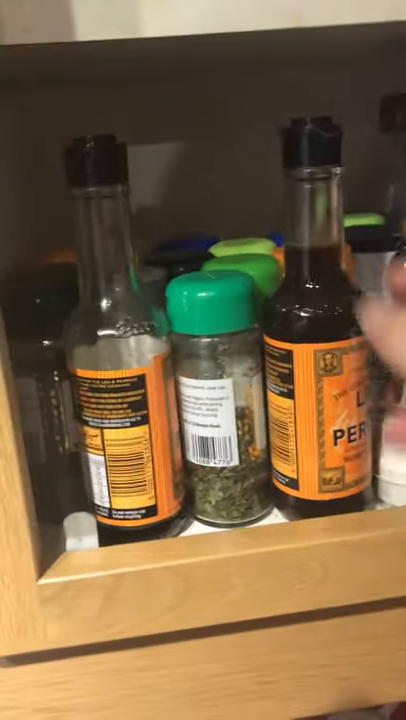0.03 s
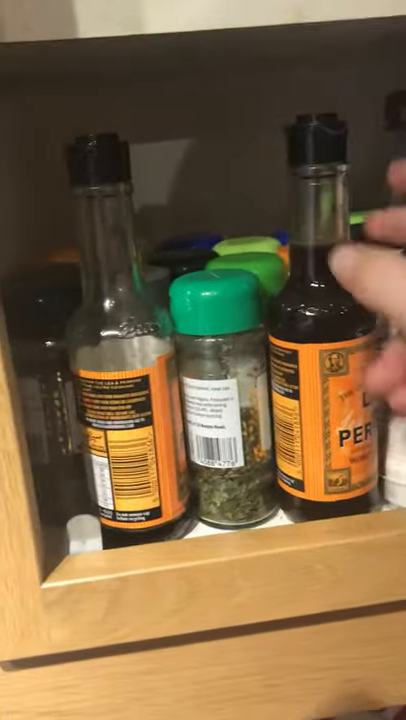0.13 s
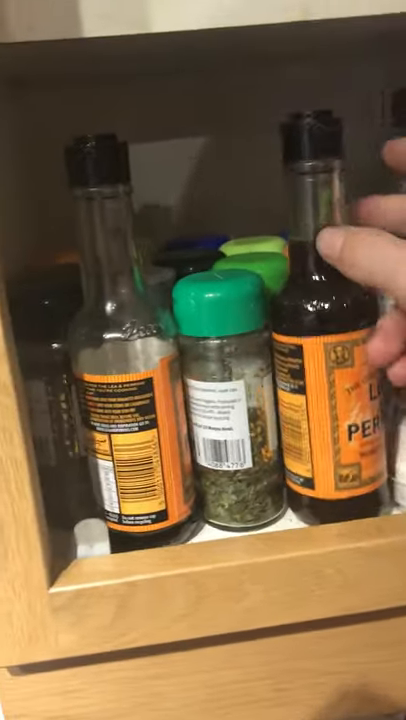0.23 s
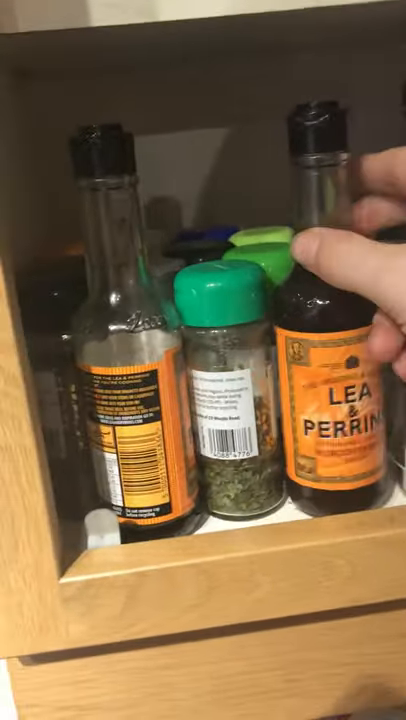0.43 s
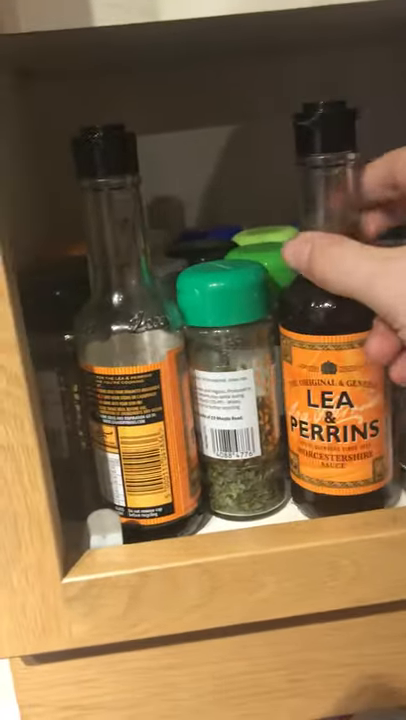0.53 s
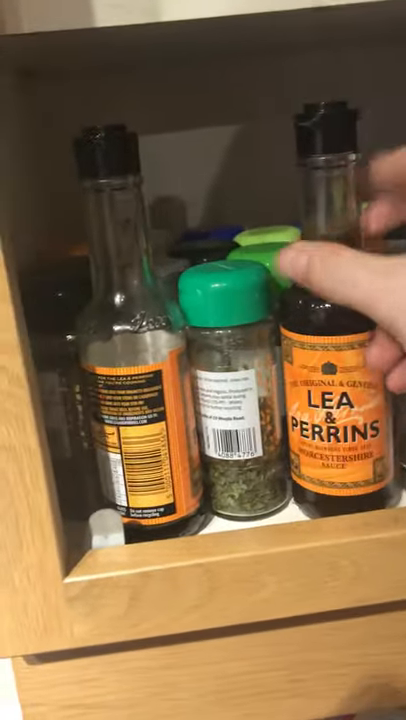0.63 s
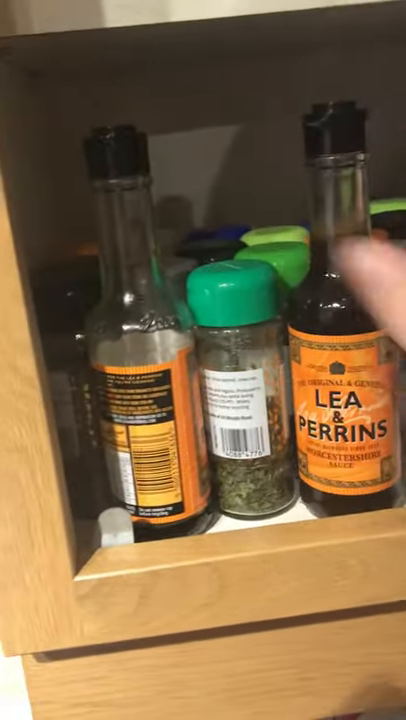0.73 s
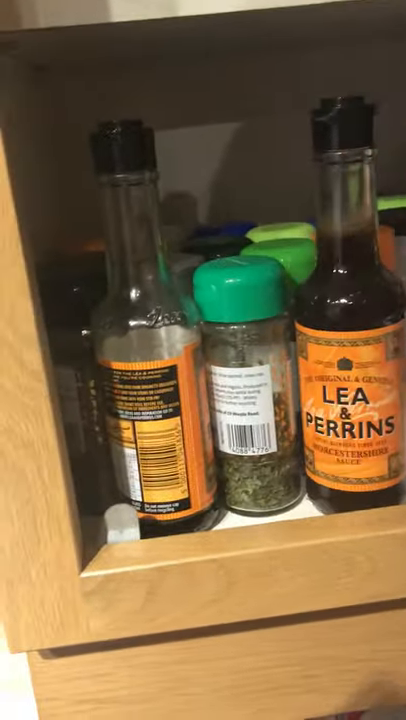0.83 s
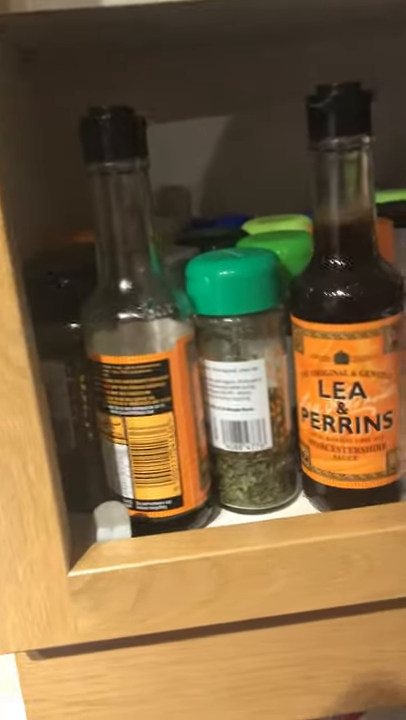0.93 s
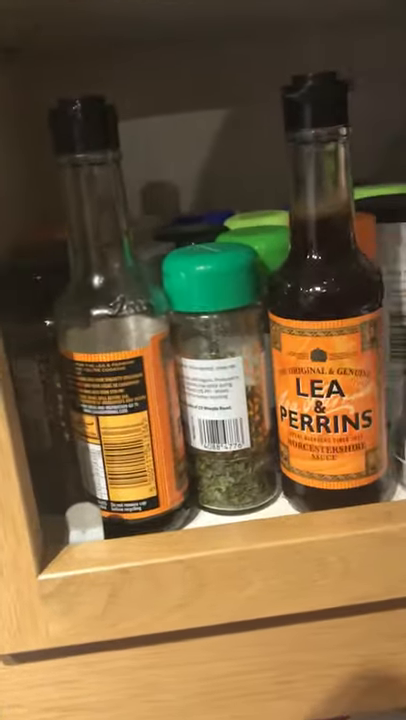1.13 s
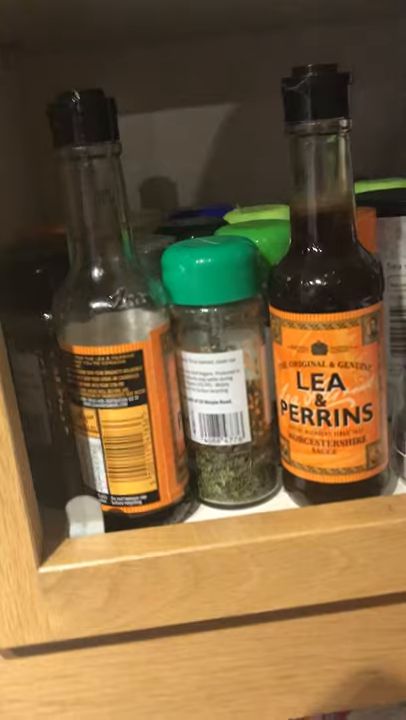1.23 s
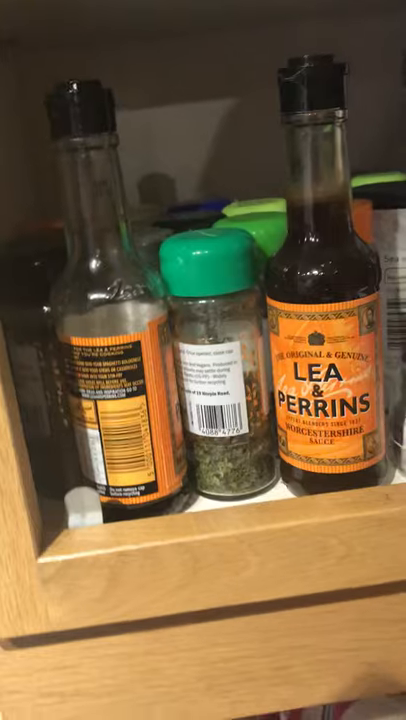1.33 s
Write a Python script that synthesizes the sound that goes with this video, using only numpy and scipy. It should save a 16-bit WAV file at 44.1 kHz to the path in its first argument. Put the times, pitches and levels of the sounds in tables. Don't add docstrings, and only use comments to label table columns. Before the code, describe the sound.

Glass bottle clinks close up in a wooden kitchen cupboard. Faint appliance hum, airy noise and high whine run throughout. At 0.2 s the bottle hits a spice jar with a hard, dry clack; light rocking taps follow until 0.3. Ringing glass clinks come at 0.38 and 0.43, a small touch between, with the ring soon damped. Wooden knocks and scraping fade by about 0.65, leaving only hum.

```python
import sys
import numpy as np
from scipy import signal
from scipy.fft import rfft, irfft
from scipy.io import wavfile
from scipy.ndimage import uniform_filter1d

SR = 44100
rng = np.random.default_rng(int(sys.argv[2]) if len(sys.argv) > 2 else 0)


def gain_from_decibels(decibels):
    exponent = np.asarray(decibels, float) / 20
    return 10 ** exponent


def master_out(mix):
    frames = np.transpose(np.atleast_2d(mix))
    ceiling = np.clip(frames, -1, 1)
    pcm = np.round(ceiling * 32767).astype(np.int16)
    wavfile.write(sys.argv[1], SR, pcm)


N = 61739

# pitch_hz, density_db_per_hz
AIR_SPECTRUM = [(18, -40), (34, -3.5), (102, -5.5), (1650, -21), (3160, -22.5), (4250, -24), (4610, -23.5),
                (7110, -29.5), (16000, -24.5)]
# pitch_hz, width_hz, level_db
WHINE = [(1010, 180, -70), (1294, 173, -68.5), (2340, 59, -71), (3200, 340, -63), (3825, 620, -71),
         (4779, 63, -62), (4595, 150, -65), (6080, 260, -65.5), (6580, 170, -68.5), (7650, 46, -75.5),
         (8566, 120, -74)]
HIGH_WHINE_HZ = [9080, 9670, 10050, 10740, 11100, 11600, 12300, 12900, 13450, 13880, 14560, 14750, 15570]
# width_hz, level_db
HIGH_WHINE = [(120, -76.5), (40, -78), (200, -79.5), (50, -72), (247, -66.5), (350, -67.5), (40, -79),
              (600, -70.5), (300, -62.5), (252, -61.5), (300, -66), (150, -66), (352, -59.5)]
# pitch_hz, width_hz, level_db
HUM = [(44, 56, -68.5), (100.4, 34, -58.5), (126.6, 28, -69.5), (196.6, 19, -64.5), (305, 7, -72),
       (399, 7, -74.5)]
# pitch_hz, level_db
MAINS = [(100, -61), (200.5, -61), (401, -74)]
AIR_DB, FLICKER_DB, FLICKER_RATE_HZ, MAINS_RATE_HZ = -57.5, 0.8, 12, 4.4

# pitch_hz, level_db, t60_s
JAR = [(520, -21.5, 0.016), (1041, -13, 0.02), (2138, -11, 0.014), (1600, -4, 0.006), (2350, -25, 0.028),
       (2915, -2, 0.0178), (3760, -7.5, 0.012), (4500, -33, 0.0125)]
JAR_S = [
    .2014,
    .2026,
    .2038,
]
# level_db, contact_ms
JAR_HITS = [(-16, 0.56), (-15.5, 0.07), (-8, 0.08)]
# pitch_hz, level_db, t60_s
RIM = [(5880, -6, 0.0073), (7950, -7.5, 0.0088), (8730, 1.5, 0.0075), (9830, -5.5, 0.008),
       (11650, -22, 0.0069), (13150, -28, .006)]
RIM_S = [
    .2026,
    .2043,
]
# level_db, contact_ms
RIM_HITS = [(-6, 0.059), (-24, 0.043)]
JAR_WALL_HZ = [6050, 6245, 8630, 6335, 9750, 8370, 8860, 6610, 14400]
# level_db, t60_s
JAR_WALL = [(-22.5, 0.39), (3, 0.057), (-32, 0.42), (-22, 0.048), (-25, 0.19), (-24, 0.113), (-24.5, 0.28),
            (-33, 0.108), (-26, .06)]
# start_s, level_db, contact_ms
JAR_WALL_HITS = [
    (.2044, -16, 0.068),
]
FILLING_HZ = [1320]
# level_db, t60_s
FILLING = [(0, 0.0074)]
# start_s, level_db, contact_ms
FILLING_HITS = [
    (.2033, -12.5, .3),
    (.2048, -14.5, 0.25),
]
JAR_BASE_HZ = [190, 318, 700, 872]
# level_db, t60_s
JAR_BASE = [(-12.5, 0.056), (-7, 0.12), (-3.5, 0.012), (-7, 0.034)]
# start_s, level_db, contact_ms
JAR_BASE_HITS = [
    (.2025, -27.5, 0.24),
    (.2072, -28.5, .3),
    (.2118, -26, 0.33),
    (.2720, -38, .4),
    (.2830, -34, .4),
]
ROCK_HZ = [900, 1325, 1645, 2360, 2840, 3250]
# level_db, t60_s
ROCK = [(-4, 0.019), (-3.5, 0.0198), (1, 0.019), (-8, .03), (-6, 0.034), (-7, 0.031)]
# start_s, level_db, contact_ms
ROCK_HITS = [
    (.2330, -33.5, .1),
    (.2715, -35.5, 0.103),
    (.2745, -39, .15),
    (.2830, -48.5, 0.24),
    (.2950, -44, .15),
]

BOTTLE_HZ = [6735, 7294, 7354, 9440, 9100, 11935, 13060]
# level_db, t60_s
BOTTLE = [(-21.5, 0.19), (-24, 0.31), (-38, 0.097), (-13, 0.081), (4.5, 0.004), (-22, 0.11), (-21, 0.086)]
# start_s, level_db, contact_ms
BOTTLE_HITS = [
    (.3763, -22, 0.0336),
    (.4340, -18.5, 0.099),
]
# pitch_hz, level_db, t60_s
NECK = [(6200, 0.5, 0.025)]
# start_s, level_db, contact_ms
NECK_HITS = [
    (.3764, -29.5, 0.042),
    (.3782, -20, 0.1),
]
# pitch_hz, level_db, t60_s
CAP = [(12900, 1.5, .014), (14800, -21, 0.028)]
# start_s, level_db, contact_ms
CAP_HITS = [
    (.3764, -25.5, 0.0384),
    (.4342, -29.5, .04),
]
FAINT_SHOULDER_HZ = [4700]
# level_db, t60_s
FAINT_SHOULDER = [(0, 0.055)]
# start_s, level_db, contact_ms
FAINT_SHOULDER_HITS = [
    (.3770, -29, .05),
]
# pitch_hz, level_db, t60_s
CONTENTS = [(1263, -7.5, 0.013), (1843, -2, 0.014), (2200, -17.5, 0.03), (2720, -3.5, 0.014),
            (4200, -8, 0.013)]
# start_s, level_db, contact_ms
CONTENTS_HITS = [
    (.3763, -16, 0.078),
    (.4050, -17.5, 0.21),
    (.4345, -16.5, 0.03),
]
BELLY_HZ = [3364]
# level_db, t60_s
BELLY = [(0.014, 0.34)]
BELLY_S = [
    .37643,
    .4341,
]
# level_db, contact_ms
BELLY_HITS = [(-17, 0.0324), (-22, .05)]
SHOULDER_HZ = [4655, 4495]
# level_db, t60_s
SHOULDER = [(3.5, 0.036), (4.5, 0.016)]
# start_s, level_db, contact_ms
SHOULDER_HITS = [
    (.4352, -26.5, .05),
]
NEIGHBOUR_HZ = [3284, 2860, 6050]
# level_db, t60_s
NEIGHBOUR = [(-1.5, 0.47), (-18, 0.046), (-13, 0.12)]
NEIGHBOUR_S = [
    .3765,
    .4341,
]
# level_db, contact_ms
NEIGHBOUR_HITS = [(-61, 0.054), (-24, 0.066)]
# pitch_hz, level_db, t60_s
SMALL_JAR = [(5250, 1, 0.029), (5000, -3, 0.03), (2940, -2, 0.012), (6760, -22.5, 0.059),
             (6260, -9.5, 0.054)]
# start_s, level_db, contact_ms
SMALL_JAR_HITS = [
    (.4052, -24, 0.078),
]

BASE_HZ = [721, 970, 1245, 1810]
# level_db, t60_s
BASE = [(-5.5, 0.022), (-0.5, 0.04), (-10, 0.057), (-4.5, 0.039)]
BASE_S = [
    .4240,
    .4462,
    .4727,
    .4768,
    .4910,
]
# level_db, contact_ms
BASE_HITS = [(-18, 0.6), (-36.5, 0.48), (-25, 0.17), (-26.5, .3), (-30.5, 0.34)]
# pitch_hz, level_db, t60_s
SHELF = [(686, -9, 0.028), (779, -3, 0.038), (889, 3.5, 0.014), (961, 0, 0.058), (1040, -2.5, 0.021),
         (1284, -5, 0.069), (1495, -1.5, 0.033), (1590, -13, 0.03), (1654, -5.5, 0.05), (1866, -16, 0.081),
         (2230, -10, 0.025), (3000, -46, .04)]
# start_s, level_db, contact_ms
SHELF_HITS = [(.3590, -38.5, 0.57), (.3790, -22.5, 0.67), (.4290, -32, 0.33), (.4830, -38, 0.24),
              (.4990, -34.5, .3), (.5060, -34, 0.24), (.5140, -39, .3), (.5220, -39, 0.34),
              (.5460, -44, 0.44)]
# pitch_hz, level_db, t60_s
CARCASS = [(156.6, -6, 0.096), (204, -8, 0.06), (238, -3, 0.11), (333, -6, 0.078), (417, -4, 0.048)]
# start_s, level_db, contact_ms
CARCASS_HITS = [(.208, -48, 3.5), (.245, -42, 1.1), (.272, -44, 0.89), (.3, -43.5, 1.17),
                (.386, -28.5, 0.59), (.399, -35.5, 1.1), (.42, -49, 2.5), (.485, -32, 2.03),
                (.505, -25.5, 2.65), (.525, -36.5, 1.3), (.57, -37.5, 2.09)]
# pitch_hz, level_db, t60_s
WORKTOP = [(96, 2.5, 0.11), (120, -20, 0.17), (160, -1, 0.13)]
# start_s, level_db, contact_ms
WORKTOP_HITS = [
    (.395, -34, 1.2),
    (.438, -29, 1.8),
    (.498, -35.5, 2.5),
    (.61, -68, 4.9),
]
BOARD_HZ = [1005, 1260]
# level_db, t60_s
BOARD = [(-4, 0.12), (-8, 0.061)]
# start_s, level_db, contact_ms
BOARD_HITS = [
    (.4770, -44.5, 0.23),
    (.5050, -44.5, .3),
    (.5460, -36.5, 0.37),
    (.5930, -36, 0.67),
]

CRACK_S = [
    .2000,
    .2026,
    .3761,
    .4048,
    .4230,
    .4338,
]
# level_db, t60_s, centre_hz
CRACKS = [(-43, 0.027, 8000), (-3.5, 0.0047, 1460), (-19, 0.026, 1240), (-38, 0.0066, 11000),
          (-29.5, 0.066, 7400), (-26, 0.047, 1580)]
# time_s, effort_db
DRAG = [(.205, -38.5), (.25, -49), (0.287, -51), (.312, -57), (.37, -53), (.44, -44), (0.499, -39),
        (.55, -52.5), (0.662, -63.5)]
# level_db, t60_s, top_hz
TAILS = [
    (-13, .05, 9000),
    (-28, .3, 4000),
]

DRAG_GRAINS_PER_S, DRAG_SCATTER_DB = 500, 1
DRAG_SHELF_DB, DRAG_CARCASS_DB, DRAG_HISS_DB, DRAG_HISS_HZ = -22, -28.5, 9, 1910
RISE_HZ, RISE_SHARE = 119, 0.36
GRIP_S, GRIP_DB, GRIP_SETTLES_S = 0.4515, -11.5, 0.021
MIC_LOW_HZ, DIP_HZ, DIP_WIDTH_HZ, DIP_SHARE = 70, 568, 87, 0.034
TOP_HZ = 15750


def tuned(first, rest):
    return [(f, *row) for f, row in zip(first, rest)]


def unit(x):
    return x / np.sqrt(np.mean(x ** 2))


def band(x, hz, width_hz):
    return signal.lfilter(*signal.iirpeak(hz, hz / width_hz, fs=SR), x)


def walk(rate_hz):
    k = int(SR / rate_hz)
    smooth = uniform_filter1d(rng.standard_normal(N), k)
    return unit(uniform_filter1d(smooth, k))


def appliance():
    f = np.maximum(np.fft.rfftfreq(N, 1 / SR), 1)
    hz, db = np.array(AIR_SPECTRUM).T
    shape = gain_from_decibels(np.interp(np.log(f), np.log(hz), db))
    air = irfft(rfft(rng.standard_normal(N)) * shape, N)
    out = gain_from_decibels(AIR_DB) * unit(air)
    for hz, width_hz, db in WHINE + tuned(HIGH_WHINE_HZ, HIGH_WHINE) + HUM:
        tone = rng.standard_normal(N)
        for _ in range(2):
            tone = band(tone, hz, 1.4 * width_hz)
        out = out + gain_from_decibels(db + FLICKER_DB * walk(FLICKER_RATE_HZ)) * unit(tone)
    t = np.arange(N) / SR
    for hz, db in MAINS:
        out = out + gain_from_decibels(db + walk(MAINS_RATE_HZ)) * np.sqrt(2) * np.sin(2 * np.pi * hz * t)
    return out


def resonate(x, hz, t60_s):
    r = np.exp(-np.log(1000) / (t60_s * SR))
    w = 2 * np.pi * hz / SR
    return signal.lfilter([0, np.sin(w)], [1, -2 * r * np.cos(w), r * r], x)


def ring(x, modes):
    out = 0
    for k, (hz, db, t60_s) in enumerate(modes):
        mode = band(resonate(x, hz, t60_s), hz, RISE_HZ + RISE_SHARE * hz)
        out = out + (-1) ** k * gain_from_decibels(db) * mode
    return out


def blows(hits):
    t, out = np.arange(N) / SR, np.zeros(N)
    for start_s, db, contact_ms in hits:
        spread_s = contact_ms / 4000
        push = np.exp(-.5 * ((t - start_s) / spread_s) ** 2)
        out += gain_from_decibels(db) * push / push.sum()
    return out


def strike(pairs):
    return sum(ring(blows(hits), modes) for hits, modes in pairs)


def cracks():
    t, noise, out = np.arange(N) / SR, rng.standard_normal(N), 0
    for start_s, db, t60_s, hz in tuned(CRACK_S, CRACKS):
        fade = (t >= start_s) * gain_from_decibels(db - 60 * np.maximum(t - start_s, 0) / t60_s)
        out = out + band(noise * fade, hz, 1.935 * hz)
    return out


def spice_jar():
    return strike([
        (tuned(JAR_S, JAR_HITS), JAR),
        (tuned(RIM_S, RIM_HITS), RIM),
        (JAR_BASE_HITS, tuned(JAR_BASE_HZ, JAR_BASE)),
        (FILLING_HITS, tuned(FILLING_HZ, FILLING)),
        (JAR_WALL_HITS, tuned(JAR_WALL_HZ, JAR_WALL)),
        (ROCK_HITS, tuned(ROCK_HZ, ROCK))])


def drag():
    t, (s, db) = np.arange(N) / SR, np.array(DRAG).T
    effort = gain_from_decibels(np.interp(t, s, db, left=-120, right=-120))
    grains = rng.random(N) < DRAG_GRAINS_PER_S / SR
    slips = grains * gain_from_decibels(DRAG_SCATTER_DB * rng.exponential(size=N))
    slips = unit(slips * rng.standard_normal(N)) * effort
    wood = gain_from_decibels(DRAG_SHELF_DB) * ring(slips, SHELF) + gain_from_decibels(DRAG_CARCASS_DB) * ring(slips, CARCASS)
    hiss = band(effort * rng.standard_normal(N), DRAG_HISS_HZ, 0.86 * DRAG_HISS_HZ)
    return wood + gain_from_decibels(DRAG_HISS_DB) * hiss


def cupboard():
    return strike([
        (CARCASS_HITS, CARCASS),
        (SHELF_HITS, SHELF),
        (WORKTOP_HITS, WORKTOP),
        (tuned(BASE_S, BASE_HITS), tuned(BASE_HZ, BASE)),
        (BOARD_HITS, tuned(BOARD_HZ, BOARD))])


def bottles():
    return strike([
        (BOTTLE_HITS, tuned(BOTTLE_HZ, BOTTLE)),
        (CONTENTS_HITS, CONTENTS),
        (NECK_HITS, NECK),
        (CAP_HITS, CAP),
        (tuned(NEIGHBOUR_S, NEIGHBOUR_HITS), tuned(NEIGHBOUR_HZ, NEIGHBOUR)),
        (FAINT_SHOULDER_HITS, tuned(FAINT_SHOULDER_HZ, FAINT_SHOULDER)),
        (SMALL_JAR_HITS, SMALL_JAR),
        (SHOULDER_HITS, tuned(SHOULDER_HZ, SHOULDER))])


def belly():
    since_grip_s = np.maximum(np.arange(N) / SR - GRIP_S, 0)
    grip = gain_from_decibels(GRIP_DB * (1 - np.exp(-since_grip_s / GRIP_SETTLES_S)))
    return grip * ring(blows(tuned(BELLY_S, BELLY_HITS)), tuned(BELLY_HZ, BELLY))


def space(x):
    t, out = np.arange(SR // 2) / SR, x
    for db, t60_s, top_hz in TAILS:
        tail = signal.lfilter(*signal.butter(1, top_hz, fs=SR), rng.standard_normal(len(t)))
        tail = tail * gain_from_decibels(-60 * t / t60_s) * (t > .002)
        tail = tail / np.sqrt(np.sum(tail ** 2))
        out = out + gain_from_decibels(db) * signal.fftconvolve(x, tail)[:N]
    return out


def scene():
    background = appliance()
    near = space(cracks() + spice_jar() + drag() + cupboard() + bottles() + belly())
    near = near - DIP_SHARE * band(near, DIP_HZ, DIP_WIDTH_HZ)
    near = signal.sosfilt(signal.butter(2, MIC_LOW_HZ, "high", fs=SR, output="sos"), near)
    return (near + background)[None]


def roll_off(x):
    return signal.sosfilt(signal.butter(12, 16850, fs=SR, output="sos"), x)


def record(dry):
    steep = signal.ellip(N=16, rp=.3, rs=60, Wn=TOP_HZ, fs=SR, output="sos")
    mix = signal.sosfilt(steep, dry)
    return roll_off(mix)


dry = scene()
out = record(dry)
master_out(out)
```